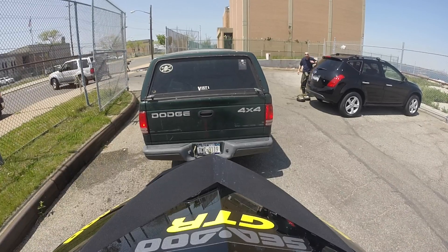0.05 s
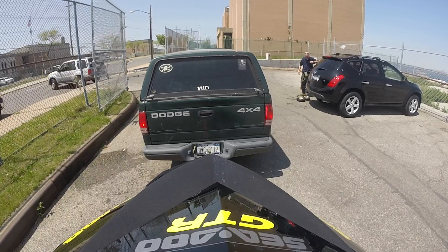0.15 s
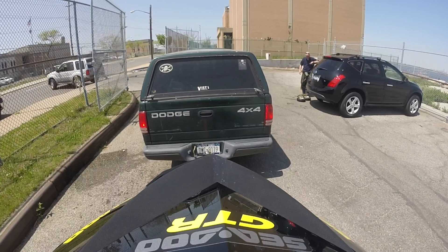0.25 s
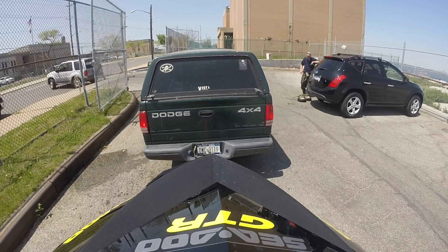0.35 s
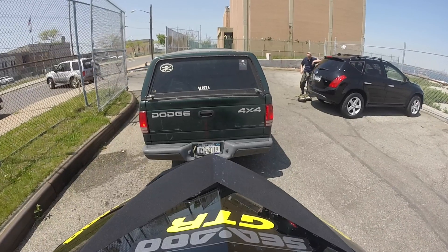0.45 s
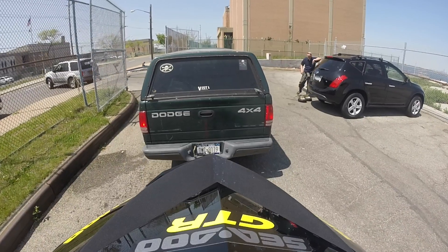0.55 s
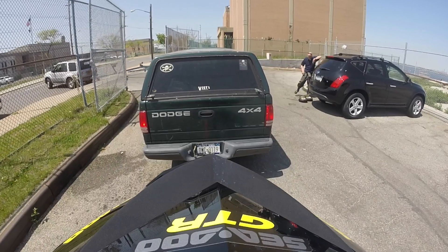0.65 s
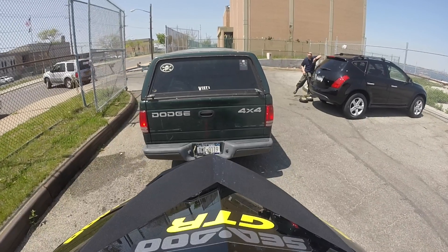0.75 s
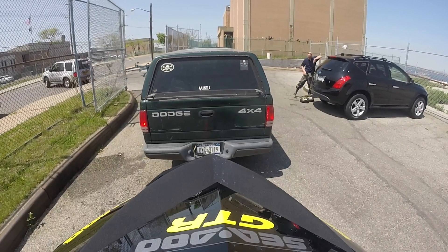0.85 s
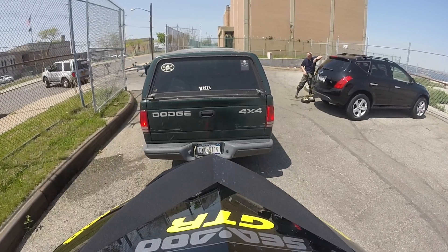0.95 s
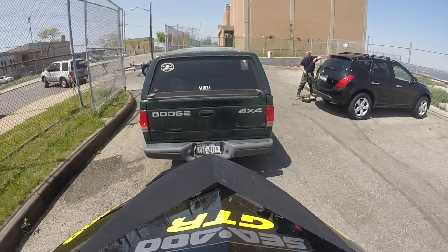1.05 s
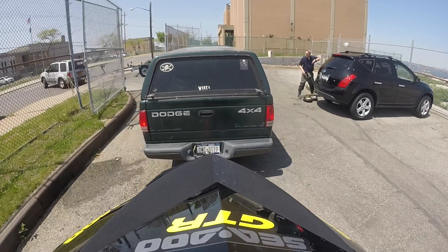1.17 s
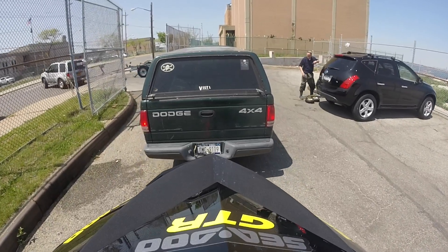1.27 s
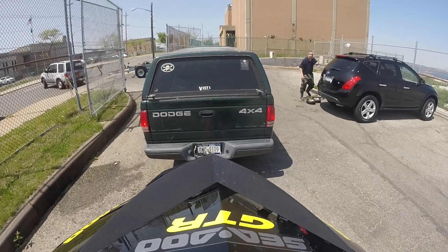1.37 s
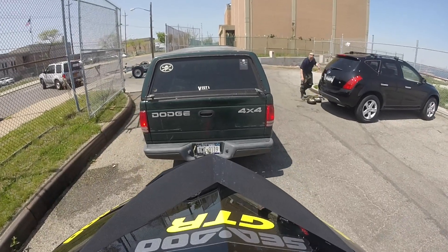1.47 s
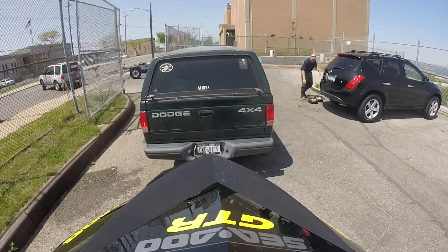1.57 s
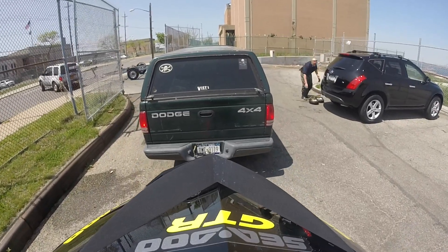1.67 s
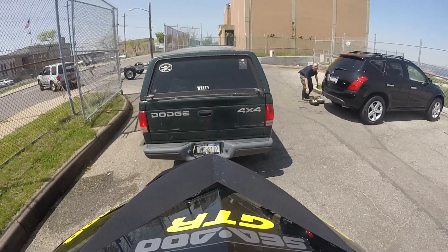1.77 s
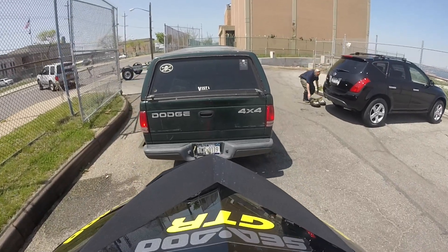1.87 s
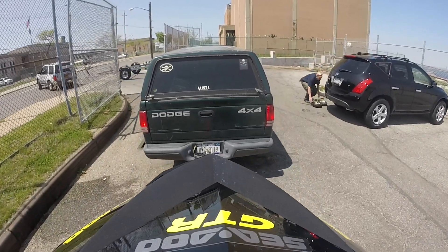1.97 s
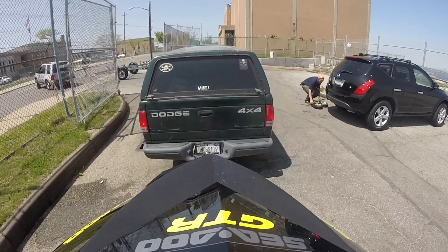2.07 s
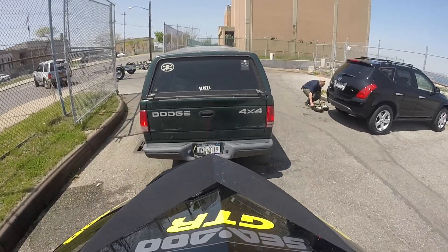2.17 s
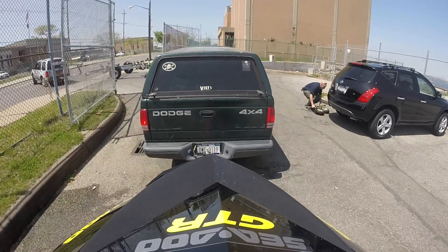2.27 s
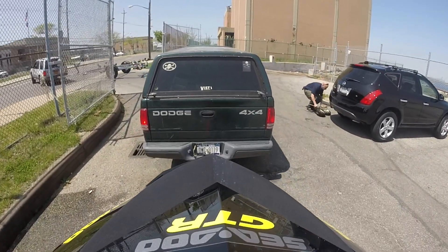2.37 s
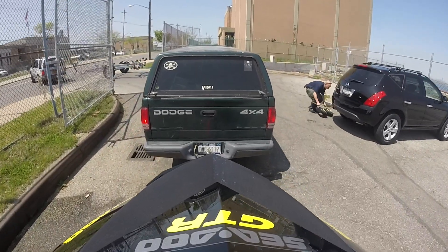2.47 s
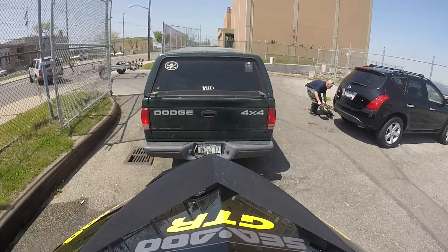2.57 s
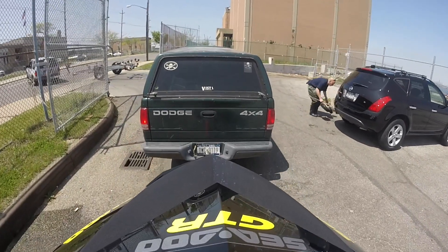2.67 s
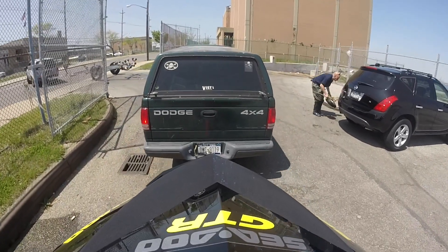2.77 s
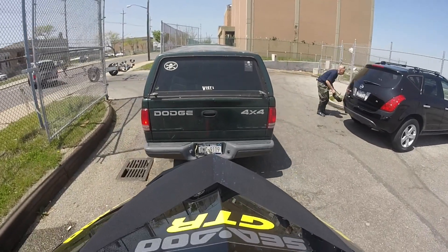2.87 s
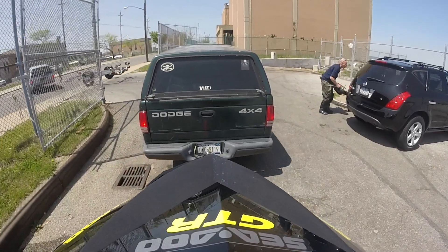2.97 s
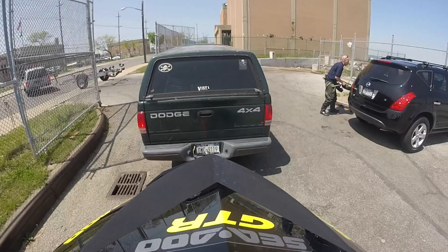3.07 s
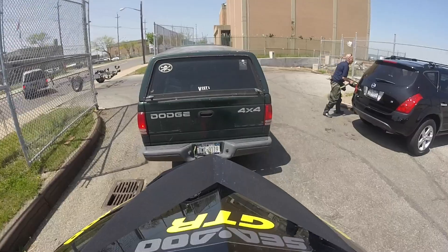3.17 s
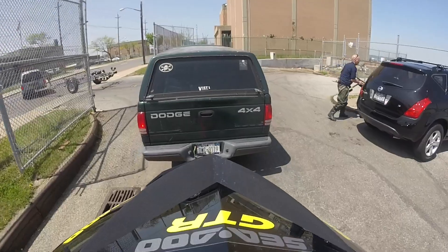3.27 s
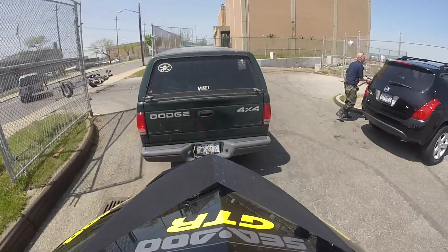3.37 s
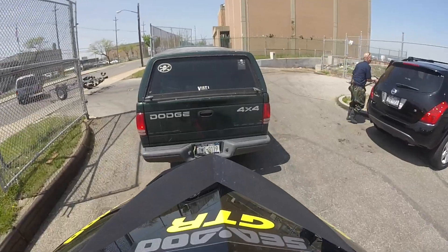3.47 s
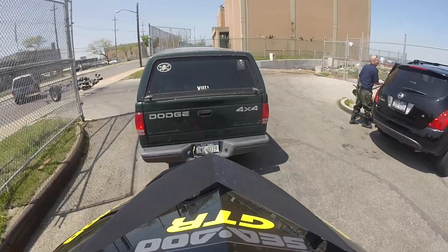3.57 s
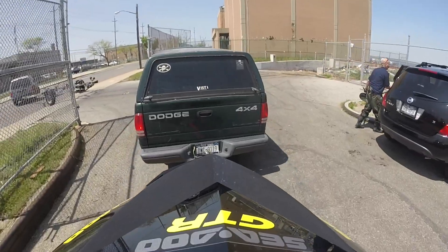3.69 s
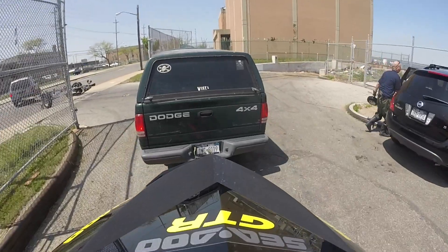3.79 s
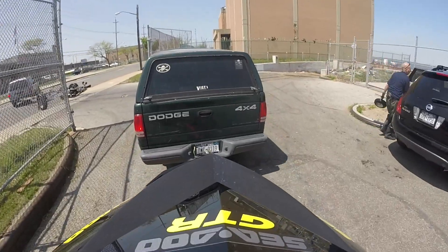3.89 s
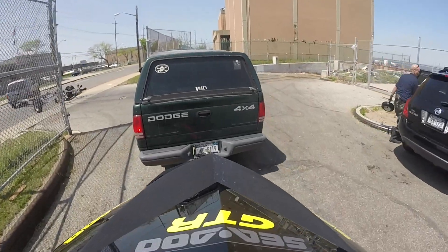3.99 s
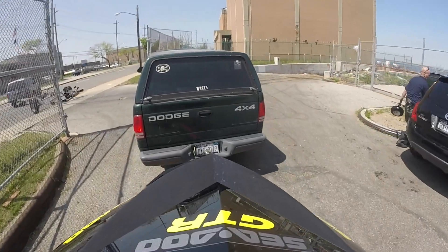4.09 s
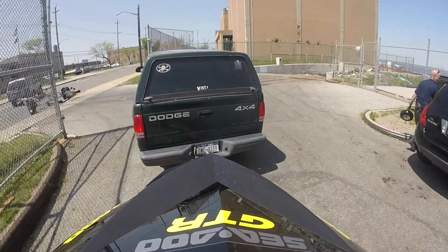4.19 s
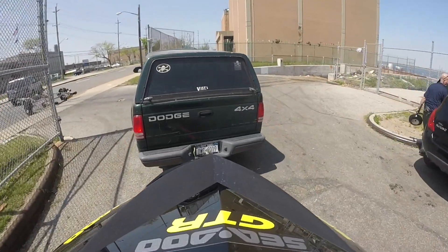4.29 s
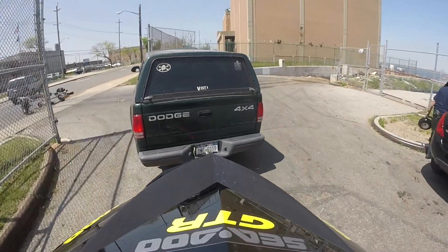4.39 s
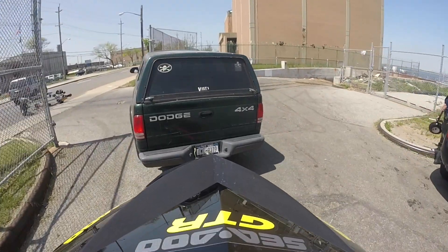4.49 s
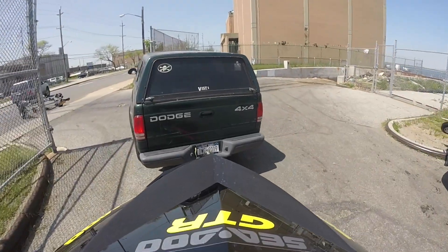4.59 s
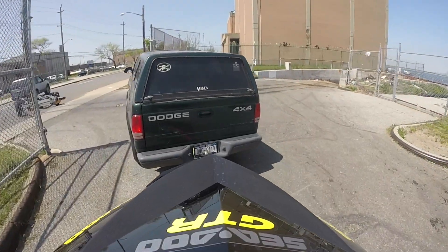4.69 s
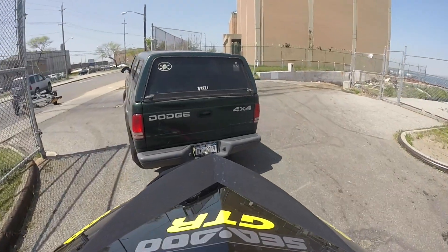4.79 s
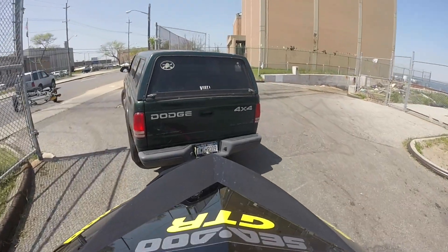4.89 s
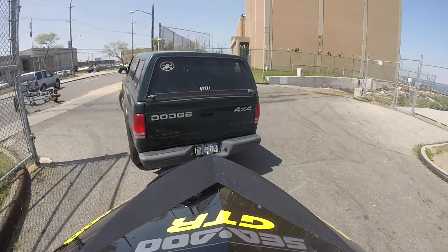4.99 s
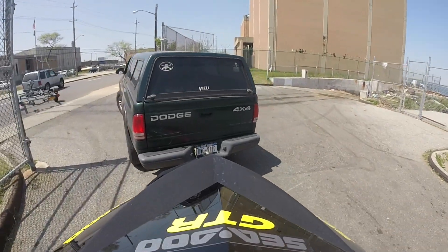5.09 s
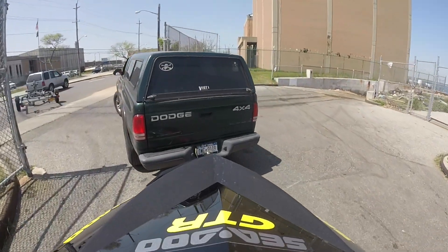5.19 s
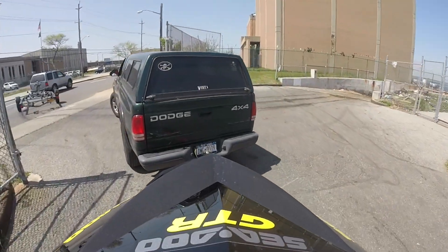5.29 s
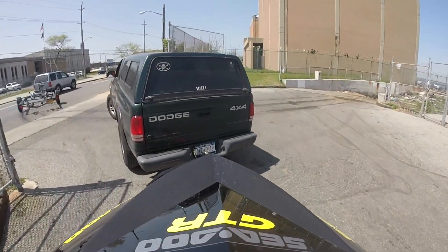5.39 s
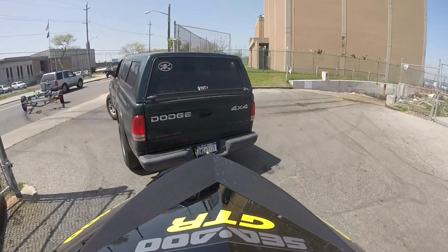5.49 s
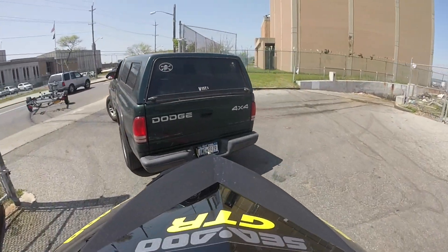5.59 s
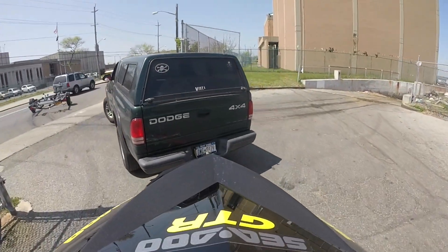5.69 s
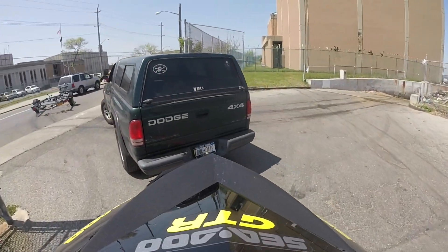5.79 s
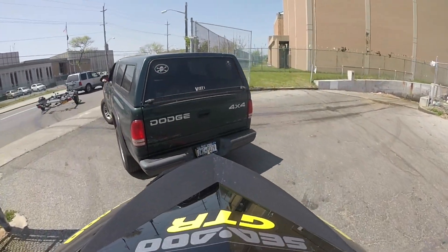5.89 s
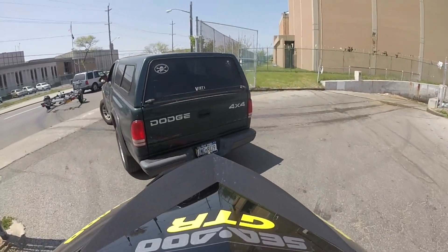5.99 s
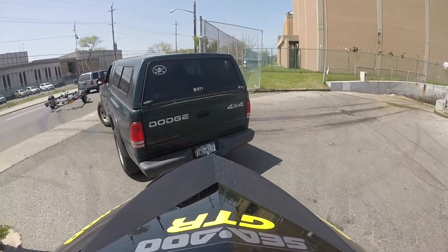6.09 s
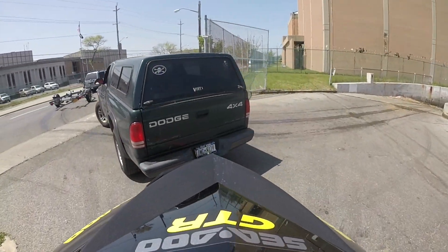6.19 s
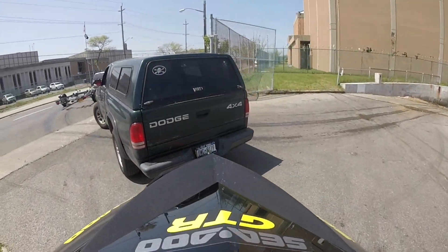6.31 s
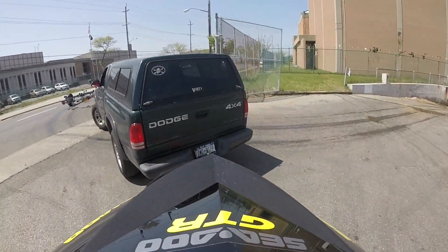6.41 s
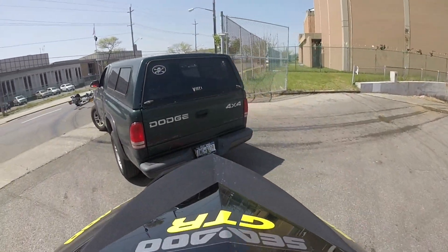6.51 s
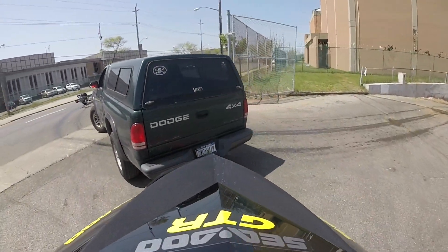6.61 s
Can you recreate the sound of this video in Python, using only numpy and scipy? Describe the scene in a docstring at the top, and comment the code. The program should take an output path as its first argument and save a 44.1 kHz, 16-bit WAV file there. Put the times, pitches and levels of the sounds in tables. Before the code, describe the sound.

From inside a sealed housing on a towed trailer: a brief scrape, tiny metal tinkles, growing low road rumble, and irregular knocks, squeaks and chattering buzz.

```python
"""A faint low rumble and hum under soft hiss swells as a trailer starts to roll, pulled slowly by a pickup truck.
A camera in a sealed housing rides on the watercraft it carries. The road shakes frame, hull and panels
(noise through narrow resonances, and wandering sines). A loose part knocks, squeaks and chatters on the housing
(bursts and clicks into ringing modes), something scrapes early on (dense slips), and small metal tinkles.
Levels in dB are set ahead of the rounding and gain in record()."""
import sys
import numpy as np
from scipy import signal
from scipy.fft import rfft, irfft
from scipy.io import wavfile
from scipy.ndimage import uniform_filter1d

SR = 44100
rng = np.random.default_rng(int(sys.argv[2]) if len(sys.argv) > 2 else 0)


def generate_wav(sig):
    """Save sig (samples, or channels by samples) to the path in sys.argv[1] as 16-bit PCM at SR."""
    pcm = np.round(np.clip(np.atleast_2d(sig).T, -1, 1) * 32767).astype(np.int16)
    wavfile.write(sys.argv[1], SR, pcm)


N = 293265
T = np.arange(N) / SR


def undb(db):
    """Level in dB to amplitude."""
    return 10 ** (np.asarray(db) / 20)


def unit(x):
    """Scale to rms 1."""
    return x / np.sqrt(np.mean(x ** 2))


def curves(table):
    """Columns of a table joined by straight lines in time."""
    s, *columns = np.transpose(table)
    return [np.interp(T, s, column) for column in columns]


def lowpass(x, order, hz):
    """Smooth roll-off above a corner frequency."""
    return signal.sosfilt(signal.butter(order, hz, fs=SR, output="sos"), x)


def damped(x, hz):
    """Treble loss, as through the sealed housing."""
    return lowpass(x, 4, hz)


def ring(x, hz, width_hz):
    """One resonance; its peak gain is 1."""
    return signal.lfilter(*signal.iirpeak(hz, hz / width_hz, fs=SR), x)


def steep(x, hz, width_hz):
    """A resonance whose skirts fall twice as fast."""
    return ring(ring(x, hz, width_hz), hz, 4 * width_hz)


def wander(hz, width_hz, depth_db):
    """Gain that strays at random around a given rate, by an rms depth in dB."""
    return undb(depth_db * unit(ring(rng.standard_normal(N), hz, width_hz)))


def grains(rate, spread_db):
    """Random clicks (rate per second), many small and a few large; rms 1."""
    hit = rng.random(N) < rate / SR
    size = rng.standard_normal(N) * undb(spread_db * rng.exponential(size=N))
    return unit(hit * size)


def steady(x, hold_s, share):
    """Even out part of the slow chance swell of a narrow noise."""
    window = int(hold_s * SR)
    power = uniform_filter1d(uniform_filter1d(x ** 2, window), window)
    return unit(x / (power + 1e-12) ** (share / 2))


def shake(modes, hold_s, share):
    """Random shaking heard through the narrow modes of one part."""
    grit = rng.standard_normal(N)
    total = 0
    for hz, width_hz, db in modes:
        tone = grit
        for _ in range(3):  # three wide resonances in a row make one with steep skirts
            tone = ring(tone, hz, 2 * width_hz)
        total = total + undb(db) * unit(tone)
    return steady(total, hold_s, share)


def hum(table, width_hz, rough):
    """A flexing part's tone: a sine on a wandering pitch, roughened by slow random shaking."""
    phase = 2 * np.pi * np.cumsum(curves(table)[0]) / SR
    in_step, across = [unit(lowpass(rng.standard_normal(N), 2, width_hz)) for _ in range(2)]
    return unit((1 + rough * in_step) * np.sin(phase) + rough * across * np.cos(phase))


# Road shake: t/s, frame sway level/dB, frame bounce level/dB, hull boom level/dB
ROAD_SHAKE = [(0.0, -46, -48, -61), (0.2, -55, -45.5, -55.5), (0.41, -44, -64, -58), (0.68, -54, -55, -53),
              (1.03, -31, -49, -52), (1.07, -28, -37, -48), (1.24, -36.5, -40, -48.5),
              (1.8, -24.5, -44.5, -46), (1.87, -26, -45, -44), (1.93, -30, -45, -59), (1.96, -26, -35, -44),
              (2.15, -44, -34.5, -42.5), (2.46, -31.5, -29, -42.5), (2.68, -25, -34.5, -40.5),
              (2.76, -27, -32.5, -29.5), (2.94, -43, -32.5, -35.5), (3.06, -23, -26.5, -31.5),
              (3.11, -28, -29, -36.5), (3.15, -31, -21, -36.5), (3.22, -40, -32.5, -27),
              (3.28, -21.5, -30.5, -42), (3.33, -28.5, -36, -31.5), (3.37, -31, -25, -38),
              (3.46, -23, -30.5, -30), (3.59, -30.5, -26.5, -29.5), (3.63, -28, -31.5, -41),
              (3.68, -51, -24.5, -25), (3.72, -36, -24.5, -40), (3.78, -31, -25.5, -31.5),
              (3.98, -37, -27, -32), (4.04, -25.5, -30, -41), (4.08, -23.5, -27, -36),
              (4.11, -30, -23, -34), (4.2, -41, -27.5, -35), (4.37, -33, -33.5, -35.5),
              (4.5, -26, -26, -36), (4.56, -24, -42, -32), (4.61, -33, -30, -36.5), (4.72, -20, -25, -28),
              (4.8, -30.5, -19.5, -35.5), (4.93, -19.5, -35, -30), (5.04, -28.5, -22.5, -34),
              (5.08, -33, -31, -31), (5.17, -24.5, -39, -37), (5.22, -19, -25, -28),
              (5.3, -25.5, -27, -30.5), (5.37, -17.5, -24.5, -26.5), (5.5, -29, -29, -33),
              (5.54, -28, -20, -34), (5.59, -24.5, -28, -21), (5.63, -26.5, -34, -30.5),
              (5.72, -21.5, -18.5, -31), (5.81, -20.5, -36, -33), (5.85, -30, -23.5, -30.5),
              (6.17, -27, -26, -32.5), (6.22, -27, -33, -38.5), (6.46, -22.5, -29.5, -30.5),
              (6.52, -21, -29, -35), (6.59, -25, -19.5, -24), (6.65, -31, -26.5, -22.5)]
# Frame and hull resonances: f/Hz, width/Hz, level/dB
FRAME_SWAY = [(17.14, 8.7, 0)]
FRAME_BOUNCE = [(32.07, 10.3, -1.5), (42.97, 2.75, -4)]
HULL_BOOM = [(73.15, 25.5, 8), (101.2, 47.4, -1.5), (110, 18, -26), (126, 7.8, -31.5)]
# Main tone of the flexing hull: t/s, f/Hz
HULL_TONE = [(2.2, 58), (2.47, 60.9), (2.55, 72.6), (2.76, 64.15), (2.83, 78.9), (2.99, 79.5),
             (3.08, 67.34), (3.38, 66.6), (3.45, 57.7), (3.65, 59.05), (3.74, 70.8), (3.86, 69.84),
             (3.96, 58.3), (4.38, 64.8), (4.64, 84.9), (4.95, 73.6), (5.72, 69.86), (5.79, 58.8),
             (5.92, 58.2), (5.99, 68.7), (6.2, 69.8), (6.29, 85.36), (6.46, 86.65), (6.65, 66.4)]
HULL_TONE_DB = -3  # against the hull's broad boom


def rumble():
    """Asphalt grit shakes the frame's sway and bounce modes and makes the hull boom."""
    sway = shake(FRAME_SWAY, 0.11, 0.77)
    bounce = shake(FRAME_BOUNCE, 0.095, 0.78)
    boom = unit(shake(HULL_BOOM, 0.1, 0.6) + undb(HULL_TONE_DB) * hum(HULL_TONE, 10.8, 0.3))
    return sum(undb(db) * part for part, db in zip((sway, bounce, boom), curves(ROAD_SHAKE)))


# Hum of the two hull panels: t/s, upper panel level/dB, lower panel level/dB
PANEL_LEVELS = [(0.0, -62, -56), (0.07, -61, -80), (0.13, -63.5, -63), (0.57, -54, -66), (0.68, -60.5, -60),
                (0.87, -43, -61), (0.91, -59, -57), (0.96, -53, -58), (1.09, -58.5, -69), (1.15, -51, -49),
                (1.33, -62.5, -58), (1.48, -54, -54), (1.72, -60, -53.5), (1.78, -50.5, -63),
                (1.93, -60.5, -41), (2.15, -41.5, -48.5), (2.31, -58, -52), (2.371, -38.5, -47.5),
                (2.44, -52, -48), (2.52, -51.5, -37.5), (2.76, -44.5, -46), (2.83, -45, -56),
                (2.93, -48.5, -45), (3.15, -39.5, -44), (3.2, -50, -37), (3.259, -42, -34),
                (3.31, -41.5, -47), (3.37, -43, -36.5), (3.631, -41, -37), (3.67, -51, -39),
                (3.76, -41, -59), (3.89, -41.5, -35), (3.96, -46, -35), (4.02, -45, -52), (4.06, -53, -39),
                (4.17, -42.5, -38.5), (4.22, -54.5, -42), (4.48, -45, -35), (4.63, -50, -50),
                (4.68, -35.5, -45), (4.81, -42, -30), (4.87, -36, -29.5), (4.98, -53, -38),
                (5.04, -39, -44), (5.15, -47.5, -37.5), (5.2, -36, -40.5), (5.26, -41, -33),
                (5.56, -40.5, -40.5), (5.59, -53, -31), (5.629, -44, -32), (5.78, -39, -39),
                (5.96, -46, -35.5), (6.02, -32, -38.5), (6.17, -45, -29), (6.31, -43, -49.5),
                (6.37, -50, -37.5), (6.48, -39, -40.5), (6.52, -44.5, -45.5), (6.59, -32, -33),
                (6.65, -47, -34.5)]
# Lesser modes of the upper panel: f/Hz, width/Hz, level/dB
UPPER_SIDE_MODES = [(187, 9.5, -7.5), (205, 6.3, -7), (265, 13.6, -10.5), (296.4, 16.7, -11.5),
                    (347.5, 80, -19)]
# Main tones, wandering as the hull flexes: t/s, f/Hz
UPPER_PITCH = [(0.1, 214.6), (0.37, 229.9), (0.72, 215.7), (1.03, 222.0), (1.07, 234.3), (1.56, 221.0),
               (2.36, 223.5), (2.4, 232.5), (3.06, 220.4), (3.14, 242.7), (3.25, 217.4), (3.55, 231.5),
               (3.69, 214.4), (3.75, 230), (4.2, 223.1), (4.28, 238.8), (4.46, 220.4), (4.55, 243.4),
               (4.64, 217), (4.73, 237), (5.43, 218), (5.61, 244), (5.66, 227.8), (6.65, 230.5)]
LOWER_PITCH = [(1.1, 151.7), (1.19, 149.8), (2.78, 151.7), (2.89, 146.5), (2.97, 149.5), (3.32, 150.8),
               (3.54, 147.5), (3.76, 152.8), (3.94, 149.5), (4.53, 148.5), (4.62, 152.0), (5.24, 151.3),
               (5.8, 147.1), (6.25, 152.8), (6.39, 149.8), (6.65, 152.8)]
SIDE_MODES_DB = -6.5  # against the upper panel's main tone


def panels():
    """Two hull panels hum through the mount, each on a wandering tone; the upper has side modes too."""
    side = shake(UPPER_SIDE_MODES, 0.11, 0.59)
    upper = unit(hum(UPPER_PITCH, 15.5, 0.91) + undb(SIDE_MODES_DB) * side)
    lower = hum(LOWER_PITCH, 7.5, 0.29)
    return sum(undb(db) * part for part, db in zip((upper, lower), curves(PANEL_LEVELS)))


# The truck's muffled engine: f/Hz, width/Hz, level/dB
ENGINE_MODES = [(112, 12, -2), (148.2, 30, -3), (182.6, 14, -4.5), (210.5, 23, -4.5)]
ENGINE_DB = -55.5


def engine():
    """The engine ahead mutters evenly: noise through a few low resonances."""
    return undb(ENGINE_DB) * shake(ENGINE_MODES, 0.13, 0.22)


# Spectrum of air and microphone noise: f/Hz, level/dB (density per Hz)
HISS_SPECTRUM = [(150, -47.5), (260, -9), (293, 6), (378, 0), (479, 0.5), (661, -1.5), (993, -5),
                 (1100, -5), (1180, -4.5), (1620, -6.5), (1770, -7.5), (3200, -11), (7860, -21.5),
                 (15000, -31.5)]
HISS_DB = -58.5
# Faint steady tone of the camera electronics: f/Hz, level/dB (rms)
WHINE_TONES = [(8032, -92)]


def hiss():
    """Muffled outdoor air and microphone noise as shaped noise, with a thin sine whine."""
    hz, db = np.transpose(HISS_SPECTRUM)
    f = np.maximum(np.arange(N // 2 + 1) * SR / N, 1)
    shape = undb(np.interp(np.log(f), np.log(hz), db))
    air = unit(irfft(rfft(rng.standard_normal(N)) * shape, N))
    air = lowpass(air, 6, 12800)  # the noise fades early at the top
    whine = sum(undb(db) * np.sqrt(2) * np.sin(2 * np.pi * hz * T) for hz, db in WHINE_TONES)
    return undb(HISS_DB) * air + whine


# Housing modes: f/Hz, width/Hz, level/dB when knocked, level/dB when rubbed
HOUSING_MODES = [(406, 116, -18.5, -6), (645, 43.5, -10.5, -3.5), (732, 48.4, 0, -1.5), (927, 94, -14, -12),
                 (1033, 91, -20, -8), (1272, 87, -17.5, -11), (1527, 37, -13, -4.5), (1639, 96, -9.5, 0),
                 (1746, 84, -21.5, -9.5), (1888, 68, -4, 1), (2260, 108, -14.5, -7.5), (2394, 84, -15, -8),
                 (2818, 160, -15.5, -15.5), (3073, 54, -14, -16.5), (3257, 204, -21, -14.5),
                 (3625, 220, -20.5, -19), (4040, 250, -27, -22.5), (4230, 280, -18, -22),
                 (4800, 450, -42, -28), (5595, 110, -22.5, -21), (5920, 150, -33.5, -32),
                 (6180, 110, -24, -29), (6680, 330, -31.5, -29), (10130, 1900, -40.5, -51)]
SQUEAK_HZ = 1656


def mode_groups():
    """Sort the housing modes by pitch: low, squeaking, other middle (and top), bright edge, top."""
    hz = np.transpose(HOUSING_MODES)[0]
    low, high = hz < 1100, hz > 4000
    edge = (hz > 2600) & ~high
    squeaking = ~low & ~edge & (abs(hz - SQUEAK_HZ) <= 140)
    others = ~low & ~edge & ~squeaking
    return low, squeaking, others, edge, high


# Knocks: t/s, level/dB, then against it: low ring level/dB, squeaking modes level/dB, bright edge level/dB,
# top level/dB; contact fade/ms, level/dB of the ring near 2.3 kHz, low ring f/Hz, middle ring f/Hz
# (fixed offsets for each group are added to these levels)
KNOCK_LIST = [(0.425, -45, -14, -4, 1.5, 5, 2.3, 2, 651, 1850),
              (1.0843, -53, -0.5, 11, -8, -15, 21, 0, 730, 1800),
              (1.202, -55, -15, 4, -4, 0, 4.4, 2, 670, 1900),
              (2.0058, -71, 4, 0, -18, -18, 6, 2, 709, 1857),
              (2.148, -49.5, -0.5, 9, -22, -19, 9.5, -1, 706, 1887),
              (2.3436, -54, 1, -5, -16, -16, 8.6, 2, 707, 1876),
              (2.488, -55, 11, -2, -18, -18, 3.3, 1, 676, 1893),
              (2.558, -38.5, -7.5, 4.5, -20, -20, 7.9, -1, 718, 1870),
              (2.695, -47, -20, 8.5, -1, -10, 12.6, 2, 701, 1810),
              (2.755, -55, -1, -1, 4, -1, 8.2, 8, 753, 1840),
              (2.7755, -31, -13, 7, -13, -15, 2.6, 6.5, 693, 1880),
              (3.0053, -46, -8.5, -4, -4, -9, 22, 2, 730, 1907),
              (3.048, -60, -8, 2, -11, -13, 5.4, 1, 713, 1870),
              (3.1193, -52, -21, -2, -19, -19, 6.9, 0, 735, 1887),
              (3.26, -45, 0, -5, -8, -9, 6.7, 6, 670, 1935),
              (3.3189, -44.5, -3, 3, -9, -9, 9.1, 4, 755, 1885),
              (3.3404, -34.5, -29, 1, -14, -14, 5.4, 1, 713, 1920),
              (3.3568, -38.5, -10, 11, -22, -29, 6.7, -2, 730, 1920),
              (3.3856, -38, -22, 1, -30, -27, 6.8, -10, 736, 1910),
              (3.4343, -54, 7, 0, -16, -16, 4.3, -2, 709, 1882),
              (3.5345, -26.5, -8.5, 3.5, -18, -18.5, 13.4, -0.5, 704, 1901),
              (3.5988, -49, -6, -2, -2, -10, 4.6, -3, 727, 1901),
              (3.7035, -46, -14, 0, -8, -9, 12, 5, 700, 1900),
              (3.9044, -59, 11, -2, -14, -14, 5.3, 1, 710, 1848),
              (3.9453, -47, -14, -3, -15, -10, 8.4, 2, 710, 1930),
              (4.101, -52, 2.5, -3, 1, -5, 12, 1, 748, 1814), (4.173, -49, -10, 5, -8, -8, 4, 2, 700, 1840),
              (4.6638, -49, 5.5, 2, -0.5, -4, 34, -2, 652, 1890),
              (4.763, -42.5, -20, 1, -10.5, -9, 4.9, 2, 667, 1834),
              (4.814, -20, -12, 2, -15, -15.5, 5.3, 1, 744, 1947),
              (4.863, -23.5, -12, -10, -20, -19.5, 1.5, -3, 721, 1905),
              (4.893, -38, -25, -2, -11, -16, 6.3, -3, 687, 1874),
              (5.011, -25.5, -16, -8, -10.5, -11.5, 6.7, 7, 649, 1910),
              (5.0311, -39.5, 1, 4, -26, -24, 5.5, -2, 699, 1920),
              (5.057, -29, -20, 1, -12, -12, 3.1, 6, 666, 1918),
              (5.2649, -14.5, -15, -4, -20, -27, 4.1, -13, 701, 1886),
              (5.3049, -31, -27, 1, -21, -20, 4.9, -3, 700, 1923),
              (5.331, -40.5, -9, 0, -14, -18, 6.7, 3, 724, 1843),
              (5.4927, -52, 9, -4, -25, -29, 6, 1, 680, 1933),
              (5.5144, -57, 8, -2, -12, -12, 5.5, 5, 680, 1826),
              (5.6314, -51, -14, 2, 1, -5, 11, 5, 691, 1838),
              (5.8392, -27, -11.5, 1, -16, -19.5, 19, -5, 706, 1923),
              (5.8581, -25.5, -17, -9, -35, -29, 6.2, 1, 734, 1884),
              (5.8766, -38, -17, 2, -11, -16, 9.8, 7, 720, 1876),
              (6.034, -32.5, -26, 5, -20, -20, 21, 0, 760, 1910),
              (6.0412, -22.5, -16.5, 4, -12.5, -15, 4.1, 4, 750, 1898),
              (6.0747, -31.5, -13, -4, -12, -12, 5.5, 8, 683, 1867),
              (6.104, -38, -16, 1, -25, -20, 8.7, -6, 662, 1897),
              (6.2642, -20, -16, -2, -17.5, -14, 3.5, -4, 712, 1925),
              (6.2746, -22.5, -11, 0, -34, -28, 2.2, -8, 725, 1950),
              (6.31, -36, -22, 2, -17, -24, 8.7, -2, 684, 1894),
              (6.4058, -43.5, 11, 6, -20, -18, 2.1, 0, 712, 1833),
              (6.4552, -38.5, -21, 2, -9, -12, 4, 8, 718, 1895),
              (6.4744, -47, -22, -2, -6, -16, 2.7, 3, 710, 1920),
              (6.5745, -32.5, -8, 8, -27, -29, 2.3, -6, 701, 1917),
              (6.6115, -33, -14, 4, -31, -27, 9.4, -8, 738, 1878)]
KNOCK_RISE_MS = 0.6
KNOCK_WIDTH_SHARE = 0.83  # a struck mode rings narrower than a rubbed one
EVEN_SHARE = 0.85  # how far every mode gets its fair part of a blow


def knocks():
    """A loose part hits the housing: each short rattling contact rings all modes from its own spot."""
    contact = grains(12000, 0.37)
    hz, width_hz, knocked_db, _ = np.transpose(HOUSING_MODES)
    low, squeaking, _, edge, high = mode_groups()
    pair = (hz > 2100) & ~edge & ~high
    low_ring = np.argmax(knocked_db)
    middle_ring = np.argmax(np.where(low, -np.inf, knocked_db))
    struck_width_hz = KNOCK_WIDTH_SHARE * width_hz
    out = np.zeros(N)
    for s, db, low_db, squeak_db, edge_db, top_db, ms, pair_db, low_hz, middle_hz in KNOCK_LIST:
        i = int(s * SR)
        t_ms = 1000 * T[:min(SR // 8, N - i)]
        struck_hz = hz.copy()
        struck_hz[low_ring], struck_hz[middle_ring] = low_hz, middle_hz

        envelope = (1 - np.exp(-t_ms / KNOCK_RISE_MS)) * np.exp(-t_ms / ms)
        bounces = envelope * contact[i:i + len(t_ms)]
        bounces = bounces / np.sqrt(np.sum(bounces ** 2) / (ms * SR / 2000))  # energy follows contact length
        bounces[:3] += undb(8.5)  # the first contact is one clean blow

        spot_db = 1.6 * rng.standard_normal(len(hz))
        gain_db = db + 14.5 + knocked_db + spot_db
        gain_db += low * (low_db + 8.5) + squeaking * squeak_db + pair * pair_db
        gain_db += edge * (edge_db + 13.5) + high * (top_db + 11.5)

        # the part of the blow's spectrum that each mode hears
        f = np.arange(len(t_ms) // 2 + 1) * SR / len(t_ms)
        off = (f - struck_hz[:, None]) / struck_width_hz[:, None]
        heard = 1 / (1 + (2 * off) ** 2)
        luck = np.sqrt(heard @ abs(rfft(bounces)) ** 2 / heard.sum(axis=1) / np.sum(bounces ** 2))
        gain_db -= EVEN_SHARE * 20 * np.log10(np.clip(luck, 0.3, 3))

        for k in range(len(hz)):
            tone = steep(bounces, struck_hz[k], struck_width_hz[k])
            out[i:i + len(t_ms)] += (-1) ** k * undb(gain_db[k]) * tone / np.sqrt(KNOCK_WIDTH_SHARE)
    return damped(out, 9000)


# Scrapes: t/s, swell/s, hold/s, fade/(dB per s), level/dB, treble level/dB against the dull part
SCRAPE_LIST = [(0.425, 0.072, 0.18, 330, -46.5, -14.5), (0.694, 0.023, 0.059, 330, -44.5, -12.5),
               (0.792, 0.04, 0.037, 300, -43.5, -20), (3.116, 0.015, 0.0075, 596, -38.5, -15.5)]
# Sudden slips within the scrapes: t/s, peak level/dB (heard against SLIP_REST_DB)
SLIP_LIST = [(0.4266, -30.5), (0.445, -36), (0.4712, -32), (0.4912, -36), (0.5137, -33.5), (0.569, -34.5),
             (0.6359, -35), (0.6583, -40), (0.699, -41), (0.7127, -37), (0.815, -36)]
# Modes of the rubbed parts: f/Hz, width/Hz, level/dB
SCRAPED_MODES = [(636.6, 8.7, 0.5), (779, 19, -7), (1113, 17, -0.5), (1323, 43, -2.5), (1663, 65, 1.5),
                 (1776, 20, 6.5), (2154, 34, -3), (2388, 38, -3), (2640, 21, 0), (3364, 96, -3.5),
                 (3584, 130, -5.5), (4170, 55, -3), (4450, 66, -12), (4560, 100, -4), (5830, 77, -3),
                 (7000, 53, -4), (6640, 100, -5), (9200, 150, -18), (9360, 67, -27.5)]
SLIP_FADE_MS, SLIP_REST_DB = 6.0, -41  # a slip adds to the steady rubbing at this level
SCRAPE_BITE_DB = -11.5  # level of the first contact against the hold
GAP_HZ, GAP_WIDTH_HZ = 5200, 370  # the housing passes little here


def scrapes():
    """Dense uneven slips all over the rubbed parts ring their modes over a broad rasp."""
    slips = 0
    for s, db in SLIP_LIST:
        fade = np.exp(-1000 * np.maximum(T - s, 0) / SLIP_FADE_MS)
        slips = slips + (T > s) * undb(db - SLIP_REST_DB) * fade
    judder = wander(29, 27, 1.2) * np.hypot(1, slips)

    dull_rings, bright_rings = 0, 0
    for hz, width_hz, db in SCRAPED_MODES:
        patchy = wander(0.94, 6.7, 1.0)  # the contact wanders
        tone = undb(db) * steep(patchy * judder * grains(5000, 1.1), hz, width_hz)
        if hz < 5200:
            dull_rings = dull_rings + tone
        else:
            bright_rings = bright_rings + tone

    rasp = judder * grains(4900, 0.77)
    dull_rasp = undb(-11.5) * damped(ring(rasp, 1770, 5800), 5540)
    bright_rasp = undb(-44) * damped(ring(rasp, 3900, 2000), 7300)
    sizzle = undb(-18.5) * ring(ring(rasp, 10400, 1200), 10400, 1200)
    sizzle += undb(-29) * steep(rasp, 12600, 1500) + undb(-28) * steep(rasp, 8650, 1200)
    dull = unit(dull_rings + dull_rasp)
    bright = unit(bright_rings + bright_rasp + sizzle)

    out = 0
    for s, swell_s, hold_s, fade_db, db, treble_db in SCRAPE_LIST:
        swell = SCRAPE_BITE_DB * np.clip(1 - (T - s) / swell_s, 0, 1)
        fade = fade_db * np.maximum(T - s - swell_s - hold_s, 0)
        out = out + (T > s) * undb(db + swell - fade) * (dull + undb(treble_db) * bright)
    return signal.lfilter(*signal.iirnotch(GAP_HZ, GAP_HZ / GAP_WIDTH_HZ, fs=SR), out)


# Bouts of the rocking loose part: t/s of the peak, level/dB, swell/s, fade/s, squeak level/dB against it
CHATTER_BOUTS = [(1.47, -64.5, 0.033, 0.068, 9), (1.63, -71, 0.034, .1, 9), (1.725, -72, 0.03, 0.04, 9),
                 (1.8, -69, 0.057, 0.07, 9), (1.92, -71, 0.037, 0.05, 8), (2.02, -59.5, 0.12, 0.044, 4.5),
                 (2.17, -59.5, 0.1, 0.033, 4), (2.38, -52.5, 0.12, 0.1, 3), (2.59, -52, 0.073, 0.054, 5.5),
                 (2.8, -53.5, 0.067, 0.06, 7), (3.08, -53, 0.076, 0.19, 3), (3.37, -52.5, 0.15, 0.047, 2),
                 (3.56, -53, .02, 0.14, -7), (3.74, -61, 0.3, 0.05, 5), (3.95, -56.5, 0.079, 0.024, -1),
                 (4.12, -61, 0.072, 0.077, -7), (4.68, -55, 0.13, 0.074, -10),
                 (4.835, -45.5, 0.048, 0.053, 1.5), (5.041, -53.5, 0.045, 0.056, 12),
                 (5.285, -48.5, 0.016, 0.06, 5), (5.585, -64, 0.036, 0.078, -1),
                 (5.66, -58.5, 0.14, 0.13, 10), (5.73, -57.5, 0.17, 0.054, -10),
                 (5.87, -53.5, 0.074, 0.39, 2.5), (6.06, -56, 0.051, 0.073, 5),
                 (6.3, -56, 0.018, 0.18, 4.5), (6.453, -43, 0.018, 0.032, -4), (6.63, -51, 0.11, 0.06, 3)]
# Steady buzz between the bouts: t/s, middle level/dB, bright edge level/dB, low ring level/dB
STEADY_BUZZ = [(0.9, -65, -67, -65), (1.8, -80, -91, -70), (2.5, -69, -62, -61), (3.2, -61, -60.5, -57.5),
               (3.9, -68.5, -63, -55.5), (4.3, -66, -59, -62), (4.7, -59.5, -53.5, -53.5),
               (5.3, -61.5, -63, -54.5), (5.9, -83, -63.5, -59), (6.65, -68, -65, -61)]
BOUT_SPAN_DB = 16.5  # level lost over one swell or fade time
BOUT_EDGE_DB, BOUT_LOW_DB = -4, 0  # bright edge and low ring against the bout


def rubbing():
    """Drive of the middle, bright, low and squeaking modes: bouts over a steady buzz."""
    bouts, squeaks = 0, 0
    for s, db, swell_s, fade_s, squeak_db in CHATTER_BOUTS:
        away = np.maximum((s - T) / swell_s, (T - s) / fade_s)
        shape = undb(db - BOUT_SPAN_DB * away)
        bouts = bouts + shape
        squeaks = squeaks + undb(squeak_db) * shape
    middle_db, edge_db, low_db = curves(STEADY_BUZZ)
    begun = T > STEADY_BUZZ[0][0]
    middle = begun * np.hypot(undb(middle_db), bouts)
    bright = begun * np.hypot(undb(edge_db), undb(BOUT_EDGE_DB) * bouts)
    deep = begun * np.hypot(undb(low_db), undb(BOUT_LOW_DB) * bouts)
    squeak = begun * np.hypot(undb(middle_db), squeaks)
    return middle, bright, deep, squeak


# below this level the other middle modes give way to the squeaking ones, by this many dB per dB
SOFT_DB, SOFT_SHARE = -55.5, 0.096


def chatter():
    """The loose part rubs and buzzes on the housing: dense clicks drive its modes in bouts."""
    middle, bright, deep, squeak = rubbing()
    buzz = wander(4.4, 20, 1) * grains(2500, 1.86)
    low, squeaking, others, edge, _ = mode_groups()
    gentle = np.minimum(middle / undb(SOFT_DB), 1) ** SOFT_SHARE
    out = np.zeros(N)
    for k, (hz, width_hz, _, rubbed_db) in enumerate(HOUSING_MODES):
        if low[k]:
            strength = deep
        elif edge[k]:
            strength = undb(5.3) * bright
        elif squeaking[k]:
            strength = middle * squeak / (middle + 1e-12)  # the squeak's own level, silent before the buzz
        elif others[k]:
            strength = middle * gentle  # gentle rubbing mostly squeaks
        push = buzz * undb(17 + rubbed_db) * strength
        out += (-1) ** k * steep(push, hz, width_hz)
    return damped(out, 9000)


# Small metal tinkles: t/s, peak level/dB, tilt to the upper modes/(dB per kHz)
TINKLE_LIST = [(0.9453, -67, 4), (0.997, -54, 0.5), (1.041, -67, -3), (1.1318, -61, 3), (1.1694, -67, 0),
               (3.123, -55, 2)]
# Modes of the small metal parts: f/Hz, width/Hz, level/dB
METAL_MODES = [(8700, 170, -5), (10230, 260, 5), (12900, 170, 1), (13400, 220, -12), (14200, 200, -7)]


def tinkles():
    """Tiny bright rings of small metal parts: a short noise tick through high modes."""
    out, t = np.zeros(N), T[:SR // 10]
    for s, peak_db, tilt_db in TINKLE_LIST:
        tick = rng.standard_normal(len(t)) * (1 - np.exp(-t / 0.0019)) * np.exp(-t / 0.0086)
        tone = np.zeros(len(t))
        for hz, width_hz, db in METAL_MODES:
            gain_db = db + tilt_db * hz / 1000 + 3.1 * rng.standard_normal()
            tone += undb(gain_db) * ring(ring(tick, hz, 2 * width_hz), hz, 2 * width_hz)
        out[int(s * SR):][:len(t)] += undb(peak_db) * tone / np.abs(tone).max()
    return out


def scene():
    """All sources add up at the one microphone."""
    shaken = rumble() + panels() + engine()
    loose = knocks() + scrapes() + chatter() + tinkles()
    return (shaken + hiss() + loose)[None]


TOP_HZ = 14500


def record(dry):
    """The recorder rounds the largest swings and cuts the top."""
    rounded = np.tanh(1.245 * dry) / 1.131
    return signal.sosfilt(signal.ellip(8, 0.2, 60, TOP_HZ, fs=SR, output="sos"), rounded)


dry = scene()
out = record(dry)
generate_wav(out)
```